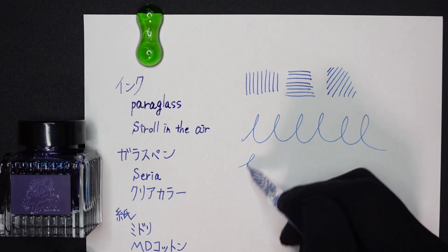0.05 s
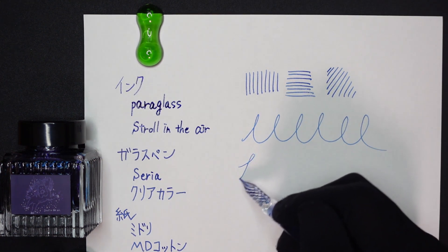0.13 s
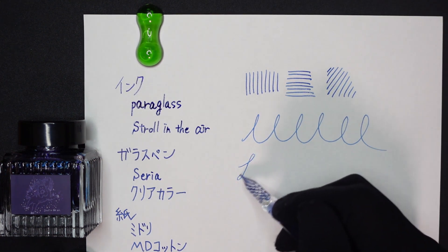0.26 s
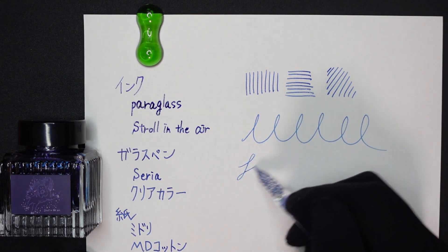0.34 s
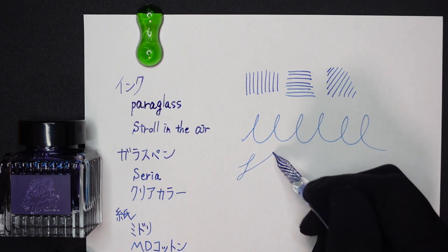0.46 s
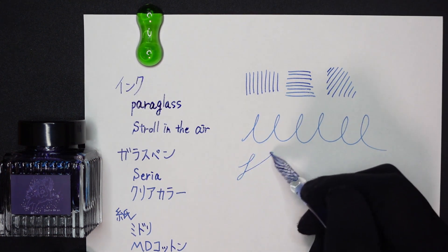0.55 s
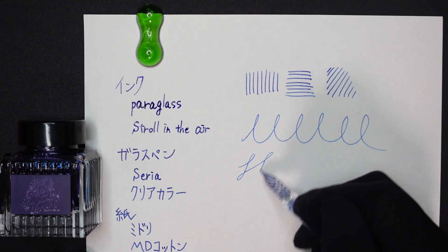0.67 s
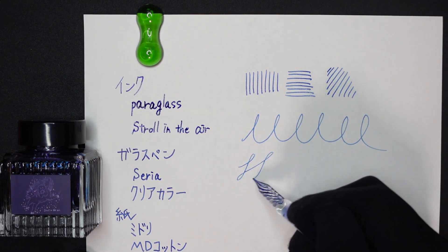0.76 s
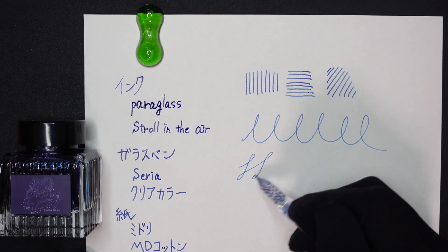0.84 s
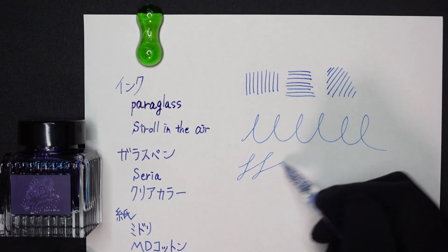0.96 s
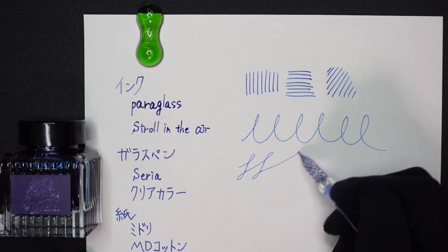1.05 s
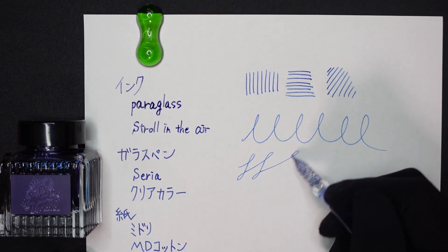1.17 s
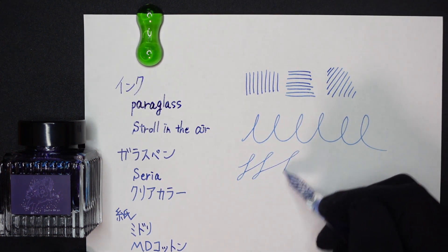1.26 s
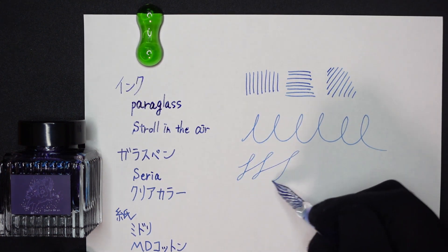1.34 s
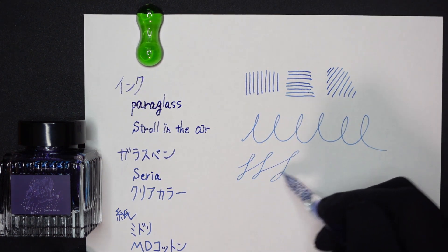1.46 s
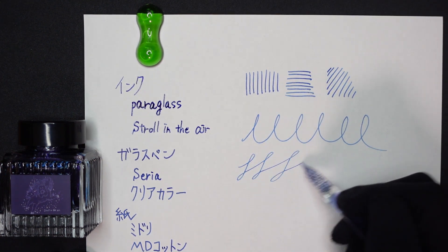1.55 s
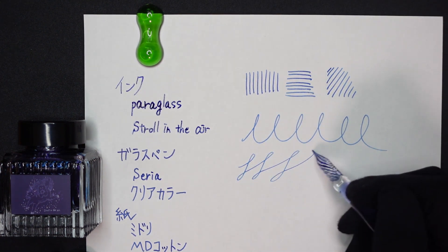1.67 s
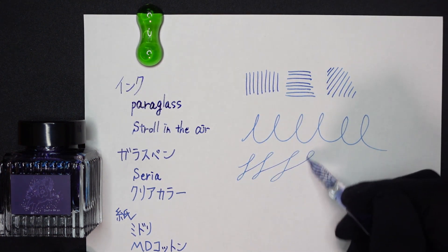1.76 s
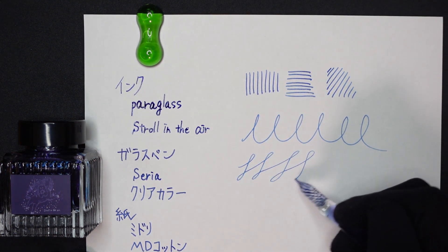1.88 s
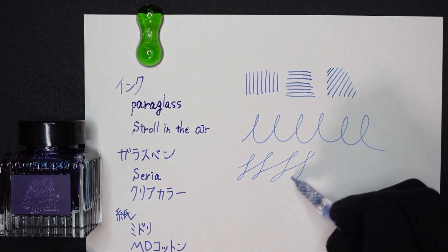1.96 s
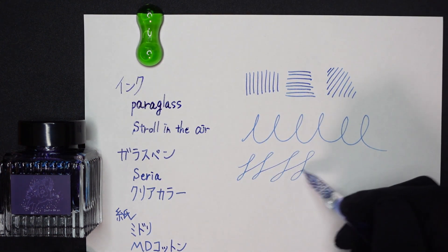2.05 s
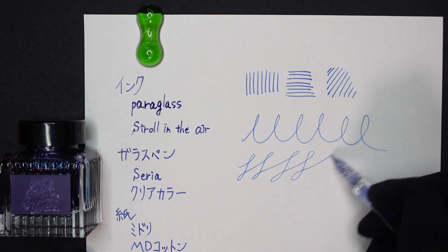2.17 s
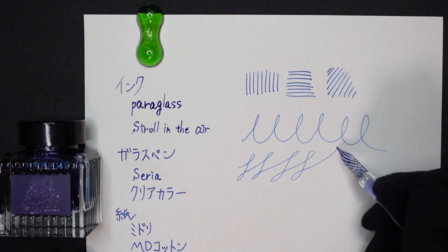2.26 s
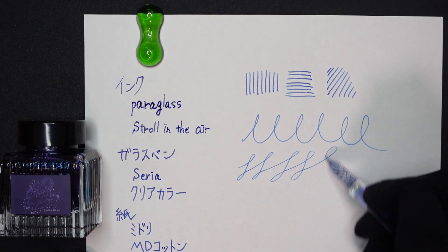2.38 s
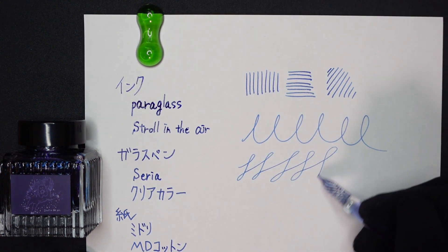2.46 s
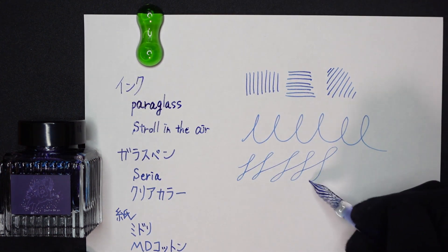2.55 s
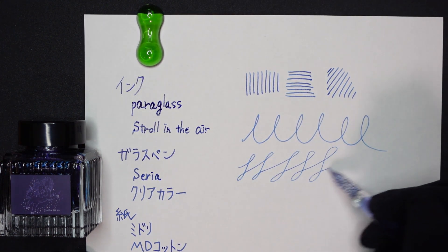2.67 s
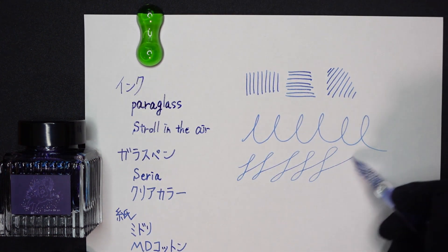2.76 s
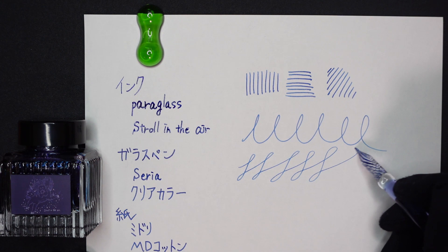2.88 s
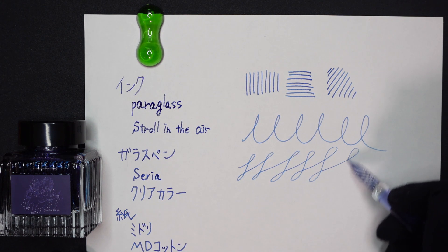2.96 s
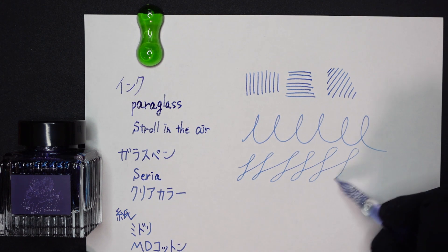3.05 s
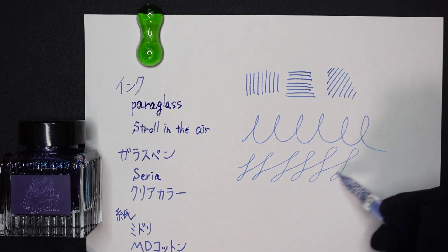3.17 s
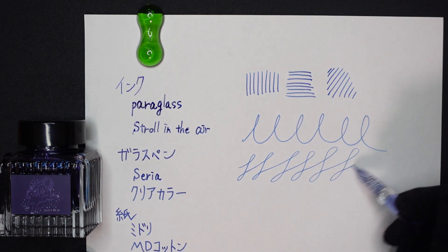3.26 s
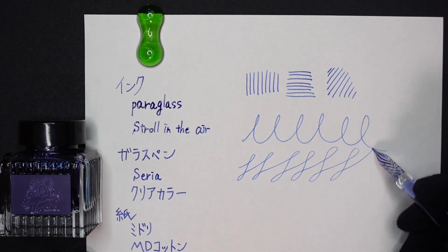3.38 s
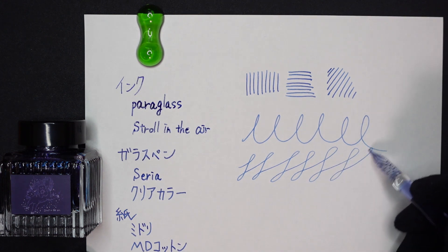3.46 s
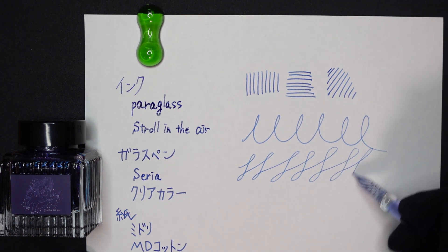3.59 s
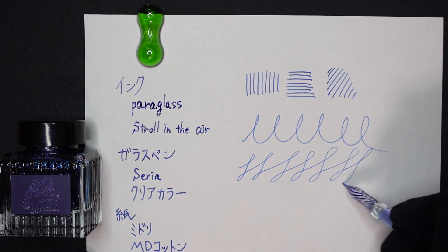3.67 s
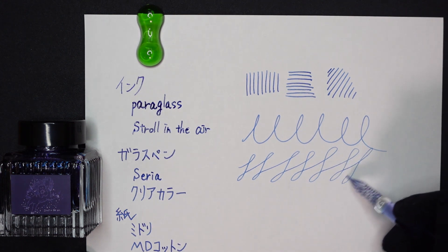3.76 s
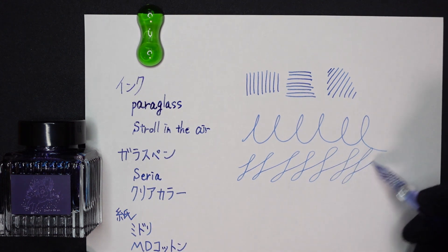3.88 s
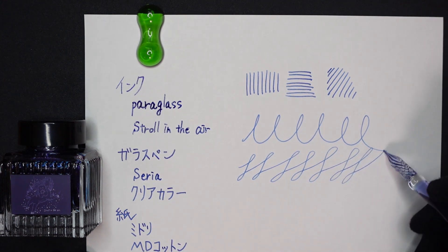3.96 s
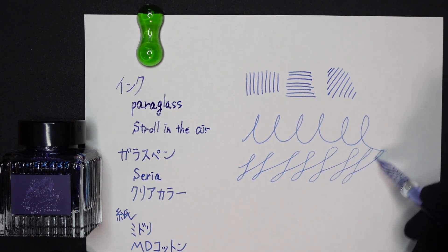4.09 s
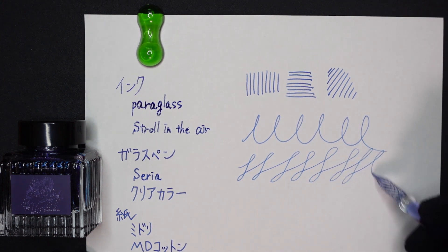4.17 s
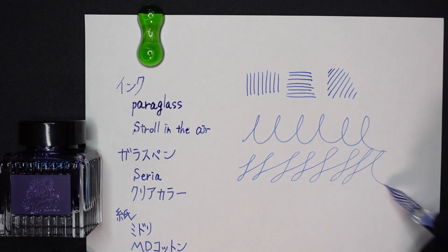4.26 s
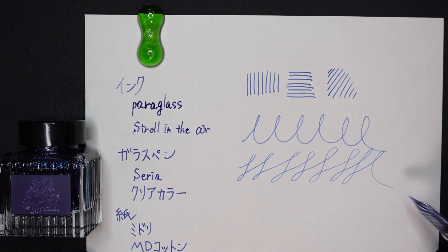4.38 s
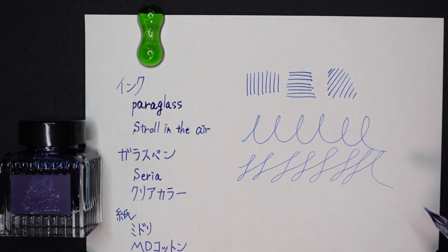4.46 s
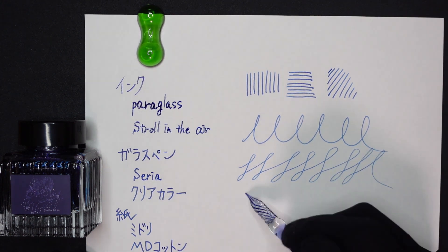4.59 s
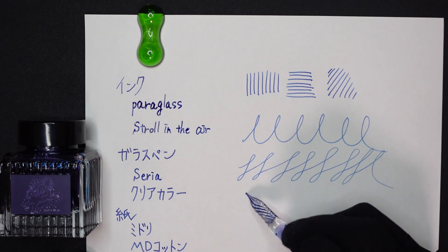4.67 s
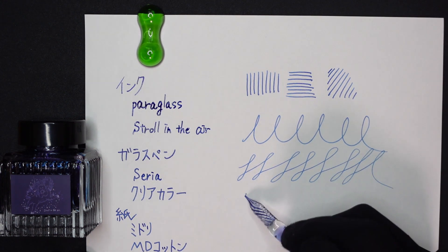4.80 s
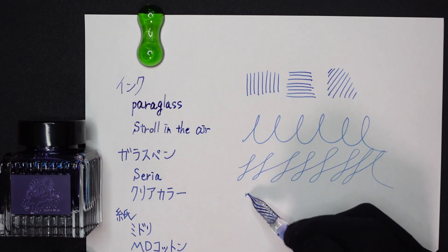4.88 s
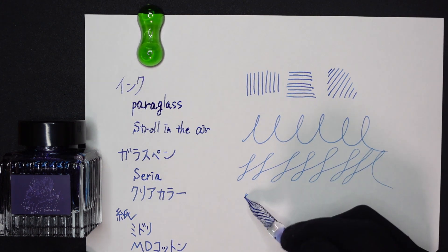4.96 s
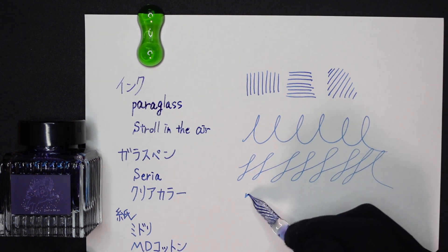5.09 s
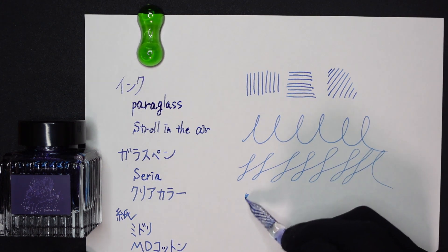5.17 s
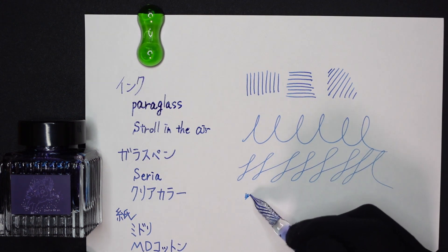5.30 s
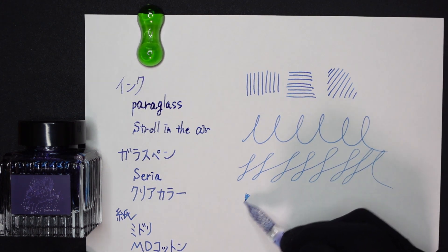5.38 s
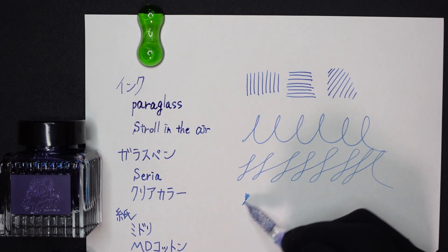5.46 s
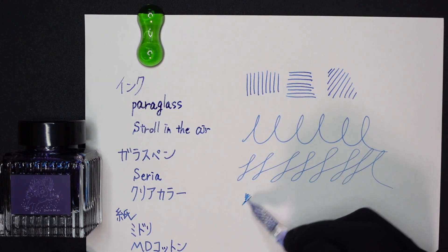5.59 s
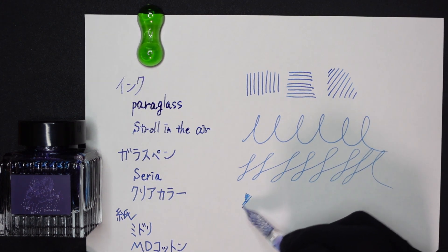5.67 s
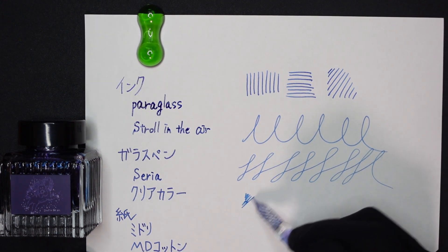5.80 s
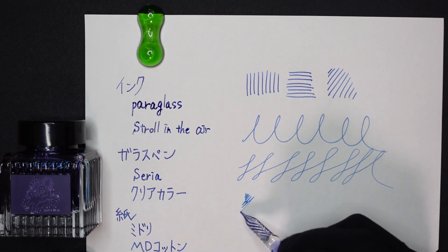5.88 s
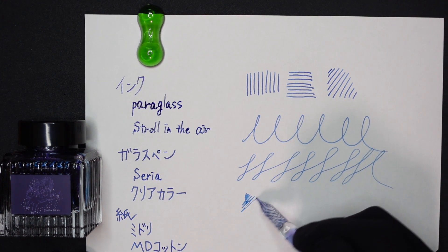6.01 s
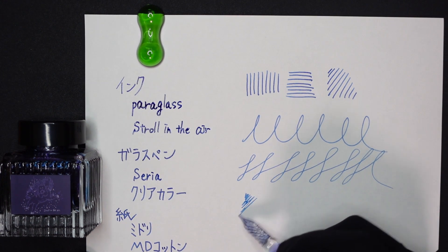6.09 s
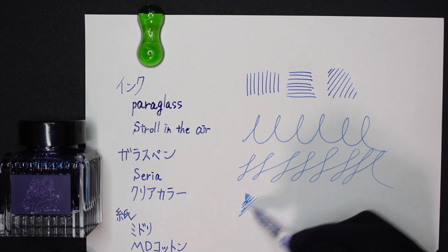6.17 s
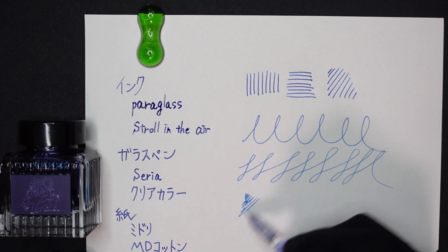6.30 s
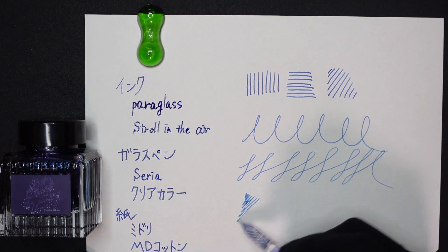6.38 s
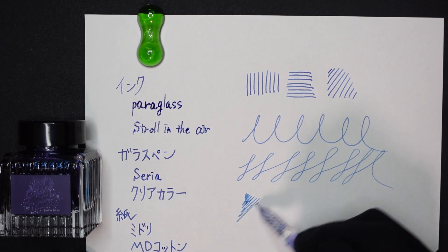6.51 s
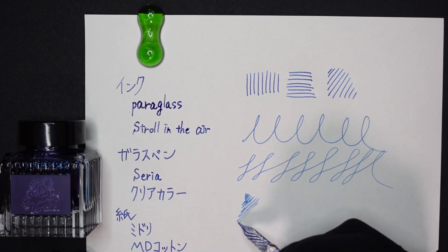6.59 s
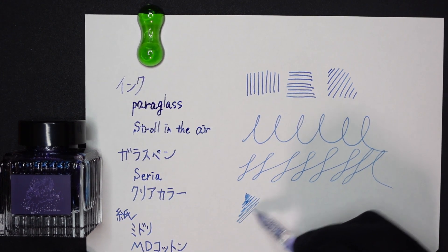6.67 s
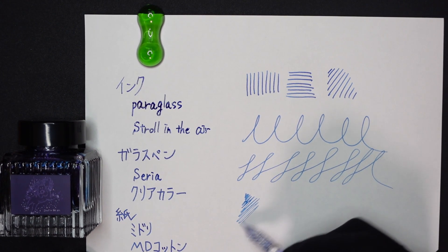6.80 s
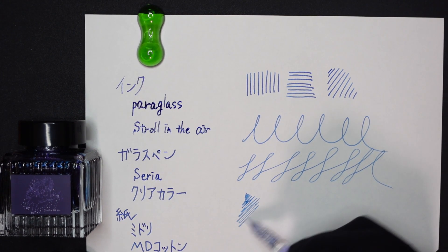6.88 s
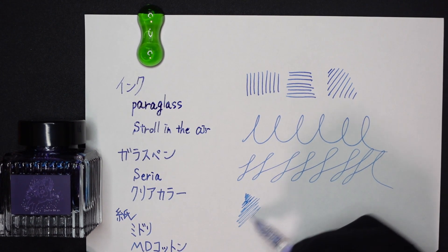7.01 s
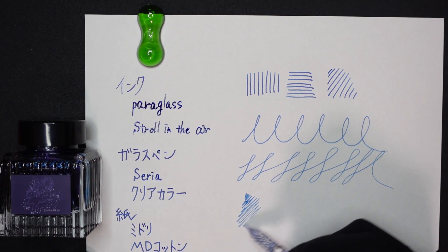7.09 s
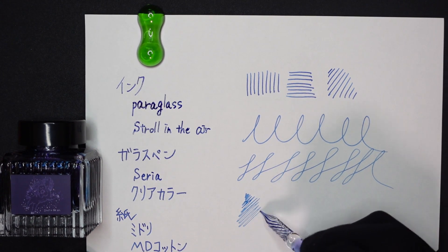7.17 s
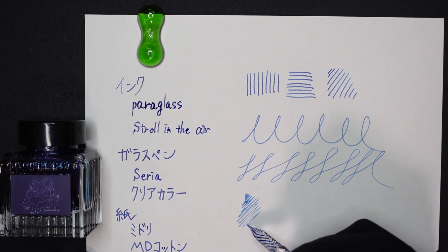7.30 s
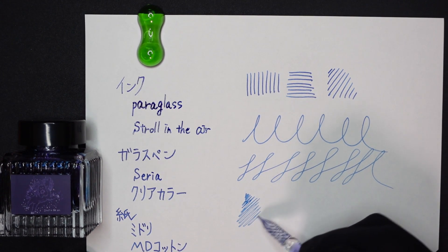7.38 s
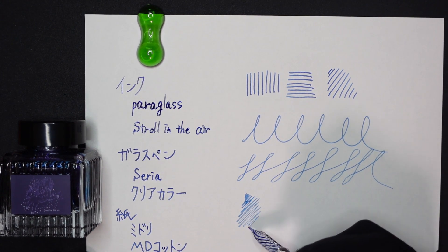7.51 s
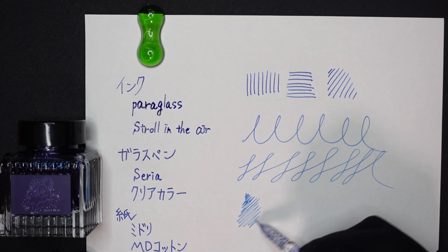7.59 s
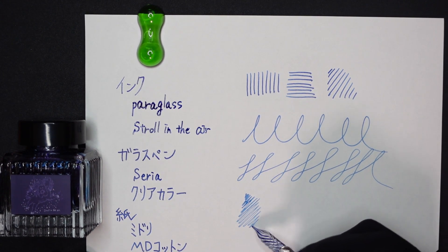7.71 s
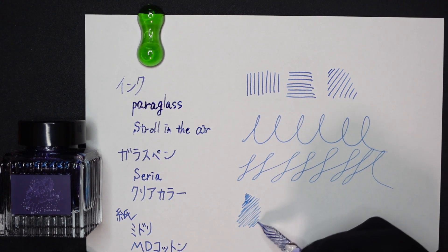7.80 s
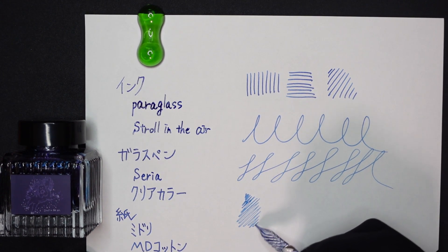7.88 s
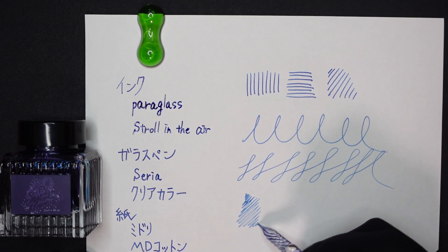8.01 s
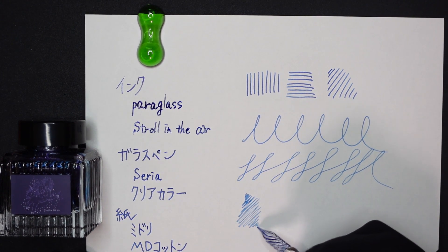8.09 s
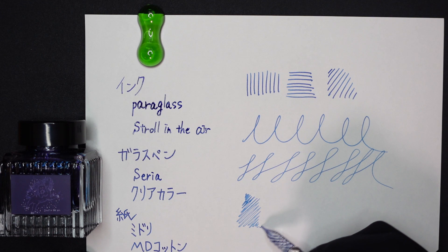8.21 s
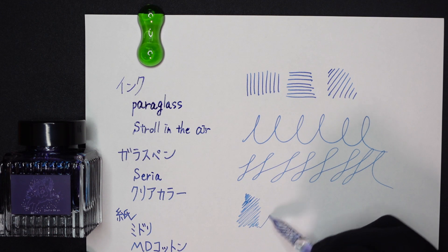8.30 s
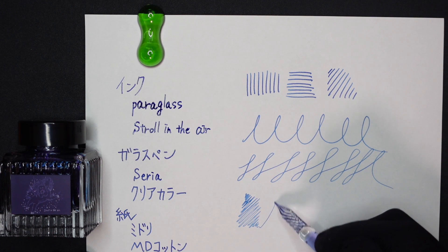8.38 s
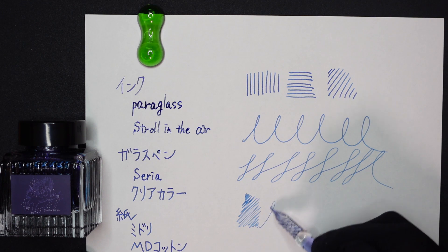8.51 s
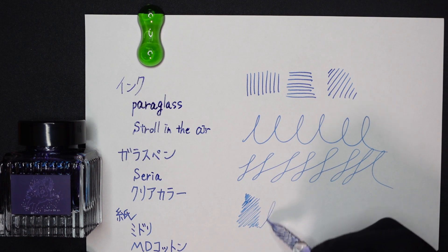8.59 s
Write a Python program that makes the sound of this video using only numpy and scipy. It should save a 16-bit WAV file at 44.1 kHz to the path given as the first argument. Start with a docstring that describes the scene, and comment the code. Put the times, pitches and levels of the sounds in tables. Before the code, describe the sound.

Close, dry pen scratching on textured paper: rhythmic looping swishes, a hand slide, rapid back-and-forth hatching that rises and fades, then two final strokes.

```python
"""A glass pen writes on a sheet of rough paper on a desk: a row of slow loops, then, after the hand
slides back, quick hatching that swells and fades, and two last strokes.
The nib catches on paper fibres thousands of times a second; these impulses excite resonances of nib, barrel and desk.
The hand slides and bumps, the arm rumbles on the desk, and a short diffuse tail and faint room noise lie behind.
A single close microphone feeds both channels."""
import sys
import numpy as np
from scipy import signal
from scipy.fft import rfft, irfft
from scipy.io import wavfile

SR = 44100
rng = np.random.default_rng(int(sys.argv[2]) if len(sys.argv) > 2 else 0)


def bounce(signal):
    """Save signal as a 16-bit WAV file at the path given by the first command-line argument."""
    frames = np.transpose(np.atleast_2d(signal))
    limited = np.clip(frames, -1, 1)
    pcm = np.round(limited * 32767).astype(np.int16)
    wavfile.write(sys.argv[1], SR, pcm)


N = 381457


def from_db(db):
    """Decibels to amplitude ratio: 20 dB per factor of ten."""
    return 10 ** (np.asarray(db) / 20)


def rms_one(x):
    """Normalise the mean power: scale to unit rms."""
    return x / np.sqrt(np.mean(x ** 2) + 1e-20)


def in_time(rows):
    """Piecewise-linear envelopes: columns of a curve table at every sample, -200 dB outside it."""
    times, *columns = np.transpose(rows)
    t = np.arange(N) / SR
    return np.array([np.interp(t, times, column, -200, -200) for column in columns])


def drift(rate_hz):
    """Low-passed chance: white noise through two equal real poles, scaled to unit rms."""
    r = np.exp(-2 * np.pi * rate_hz / SR)
    settle = 9000   # samples dropped while the filter settles
    noise = rng.standard_normal(N + settle)
    return rms_one(signal.lfilter([1], [1, -2 * r, r * r], noise)[settle:])


def shaped(x, spectrum):
    """Linear filtering in the frequency domain by a table of (frequency [Hz], gain [dB])."""
    hz, level_db = np.transpose(spectrum)
    grid = np.fft.rfftfreq(N, 1 / SR) + 1   # 1 Hz up, so the logarithm exists at zero
    gain = from_db(np.interp(np.log(grid), np.log(hz), level_db))
    return irfft(rfft(x) * gain, N)


def coloured(spectrum):
    """Coloured noise: white noise given a spectral shape, at unit rms."""
    return rms_one(shaped(rng.standard_normal(N), spectrum))


def still_room():
    """Background noise: a steady random sound with the spectrum of the quiet room."""
    # spectrum of the quiet room: (frequency [Hz], relative level per Hz [dB])
    still_spectrum = [(18, -30), (30, 0.5), (656, 6.5), (728, -1), (15500, -16.5)]
    return from_db(-99.5) * coloured(still_spectrum)


def room(x):
    """Diffuse reverberation: convolution with exponentially decaying noise, a little duller than the source."""
    t60_s, onset_s = 0.14, 0.004
    t = np.arange(SR // 2) / SR
    tail = rng.standard_normal(len(t)) * from_db(-60 * t / t60_s) * (t > onset_s)
    tail = signal.lfilter([1], [1, -.3], tail)
    return signal.fftconvolve(x, tail / np.sqrt(np.sum(tail ** 2)))[:N]


def hand():
    """Sliding friction as noise with an airy top, the arm's rumble, and bumps exciting the desk's lowest mode."""
    # hand sliding on the sheet: (time [s], slide level [dB], airy top level [dB])
    slide_levels = [(4.556, -120, -120), (4.559, -63, -80), (4.66, -66.5, -101), (4.72, -76, -79),
                    (4.78, -78.5, -81), (5.4, -72.5, -78), (6.0, -63, -97), (7.0, -65, -84.5),
                    (7.6, -77.5, -81.5), (8.0, -96.5, -102), (8.3, -98.5, -104)]
    # spectrum of skin on paper: (frequency [Hz], relative level per Hz [dB])
    slide_spectrum = [(18, -37), (30, -12.5), (479, -14), (575, -16.5), (945, -8.5), (1680, -14),
                      (1870, -15), (6720, -22.5), (15500, -26.5)]
    # low rumble of the arm on the desk: (time [s], level [dB])
    rumble_levels = [(0.0, -74), (0.12, -80.5), (3.93, -88), (4.04, -81), (4.43, -106), (4.58, -95),
                     (4.82, -101), (5.9, -79.5), (7.28, -81.5), (8.12, -102), (8.65, -88.5)]
    # heel of the hand bumping the desk: (time [s], drive level [dB])
    bump_levels = [(0.169, -77), (0.72, -70.5), (0.953, -88), (1.353, -73), (1.625, -82), (1.899, -80),
                   (2.199, -80.5), (2.499, -89), (3.052, -80.5), (3.388, -83), (3.999, -79.5)]

    slide_db, airy_db = in_time(slide_levels)
    slide = from_db(slide_db) * coloured(slide_spectrum)
    high_pass = signal.butter(4, 9000, "high", fs=SR, output="sos")
    airy = from_db(airy_db) * rms_one(signal.sosfilt(high_pass, rng.standard_normal(N)))

    rumble_spectrum = [(10, 0), (25, -2.5), (70, 4.0), (130, 4), (200, 2.0), (20000, -80.0)]   # (Hz, dB)
    rumble = from_db(in_time(rumble_levels)[0]) * coloured(rumble_spectrum)

    t = np.arange(SR // 4) / SR
    thud = np.sin(2 * np.pi * 71 * t) * t / 0.017 * np.exp(1 - t / .03)   # 71 Hz, soft onset
    bumps = np.zeros(N)
    for s, drive_db in bump_levels:
        bumps[round(s * SR)] = from_db(drive_db)
    return slide + airy + rumble + signal.fftconvolve(bumps, thud)[:N]


def add(force, s, levels_db, shapes):
    """Superposition: lay one movement of the nib onto the forces on all parts."""
    start = round(s * SR)
    span = force[:, start:start + shapes.shape[1]]   # a view, cut short at the end
    span += (from_db(levels_db)[:, None] * shapes)[:, :span.shape[1]]


def hump(length_s, top, sharpness):
    """Skewed half-sine: from rest to full at the given place 0-1, and back to rest."""
    along = np.linspace(0, 1, round(length_s * SR))
    skew = np.log(.5) / np.log(np.clip(top, .1, .9))
    return np.sin(np.pi * along ** skew).clip(0) ** sharpness


def shared(scratch_db, squeak_db, *others_db):
    """Power division: nib ring and squeak together make the scratch level; other parts are relative to it."""
    nib_db = -10 * np.log10(1 + from_db(2 * squeak_db))
    return scratch_db + np.array([nib_db, nib_db + squeak_db, *others_db])


def loops():
    """Speed-dependent friction: fast runs drive every part; slow bends are thin and mostly ring the nib."""
    # fast straight runs, the two last strokes among them: (time of top speed [s], speeding up [s],
    # slowing down [s], scratch [dB], squeak re nib ring [dB],
    # then re scratch: barrel [dB], desk [dB], shank [dB], hiss [dB], air [dB])
    runs = [(0.136, 0.11, 0.14, -49.5, -7, -1, 0.4, -3, -8.5, -12),
            (0.45, 0.19, 0.12, -48, -2, -0.5, -0.1, -2, -8, -11),
            (0.738, 0.12, 0.13, -52, -3, -0.5, 1, 0.5, -6.5, -8),
            (1.036, 0.16, 0.14, -50, 0.5, 2.5, 2, 2.5, -3, -8),
            (1.34, 0.092, 0.12, -53.5, -6, 2, 5, -1, -5.5, -12),
            (1.622, 0.19, 0.14, -50.5, -4.5, 1, 0.6, 0, -4.5, -13),
            (1.885, 0.1, 0.13, -50.5, -8.5, -0.2, -4, -3, -9, -16),
            (2.218, 0.19, 0.12, -46, -6.5, -5, -6.5, -5, -7.5, -20),
            (2.501, 0.11, 0.15, -48, -13, -7, -9, -3.5, -11, -25),
            (2.808, 0.15, 0.099, -46.5, -7.5, -3.5, -4.5, -3, -4, -22),
            (3.084, 0.095, 0.1, -49, -12.5, -3, -1.5, -1.5, -5, -20),
            (3.373, 0.14, 0.1, -50, -10.5, -12.5, -5, -6, -2.5, -14),
            (3.66, 0.15, 0.12, -52, -7.5, -5.5, -4.5, -4, -4, -14.5),
            (3.96, 0.14, 0.11, -48, -13.5, -11, -6.5, -6, -2.5, -13.5),
            (4.201, 0.088, 0.15, -58, -10.5, -5, -11.5, -6, -4.5, -3.5),
            (4.334, 0.085, 0.047, -55, -11.5, -12, -25, -8.5, 1.5, -5),
            (8.401, 0.095, 0.092, -49, -0.2, -2, -13, -5.5, -6, -23),
            (8.66, 0.12, 0.1, -51.5, -3, -15.5, -26, -13.5, -11.5, -26)]
    # slow bends round the loop ends: (start [s], length [s], scratch [dB], squeak re nib ring [dB],
    # then re scratch: barrel [dB], shank [dB], hiss [dB])
    bends = [(0.001, 0.025, -74, -7, -2.5, 0, -8), (0.016, 0.075, -61, -9, -7, -8, -8.5),
             (0.252, 0.079, -64, -3, -3, -4, -13), (0.527, 0.095, -71, -8, -6, -2.5, -7),
             (0.597, 0.069, -68.5, -7, -5, -2, -6), (0.82, 0.08, -84, -5, 5, 0.4, -3),
             (0.871, 0.15, -68.5, -4, 9.5, 2, -9), (1.149, 0.085, -65.5, -6, -4, -3, -5),
             (1.203, 0.16, -55, -12, -14, -8.5, -13), (1.425, 0.054, -82, -9, 8, -8, -4),
             (1.458, 0.12, -67, -11.5, 7.5, -5, -13), (1.724, 0.085, -62.5, -6.5, -9, -5, -11),
             (1.792, 0.065, -59.5, -23, -9, -9, -10), (1.97, 0.068, -82, -6, 0.4, 5, -6),
             (2.013, 0.073, -66.5, 0, -9, -5, -15), (2.308, 0.12, -68.5, -7, -10, -3.5, 0.5),
             (2.382, 0.1, -63.5, -26, -8, -6, -11), (2.623, 0.13, -59.5, 0, -11, -6.5, -9),
             (2.863, 0.12, -69, -10, -11, -4.5, 0), (2.965, 0.17, -57, -21, -25, -7, -1),
             (3.175, 0.13, -59.5, -7.5, -8, -7.5, -7), (3.45, 0.25, -83.5, -20, -9.5, -11, 4),
             (3.775, 0.1, -64.5, 6, -2.5, -10, -3), (4.036, 0.081, -85, -10.5, -8, -2, 3),
             (4.092, 0.102, -63, -27, -23, -10, -5), (4.346, 0.097, -88, -9, -8, -2.5, 5),
             (8.283, 0.074, -70, 2, -14, -12.5, -14), (8.31, 0.041, -61.5, 4, -21, -8, -15),
             (8.458, 0.087, -83, -4, 1, -6, -3), (8.515, 0.096, -69.5, 7, -18, -7, -10)]
    start_sharpness, stop_sharpness = 2.65, 2.27
    desk_sharpness = 1.4   # the desk follows the speed more steeply
    bend_desk_db = -11   # relative to the scratch

    force = np.zeros((7, N))
    run_times, run_airs_db = np.transpose(runs)[[0, -1]]
    for s, up, down, scratch_db, *colours_db in runs:
        speeding, slowing = np.linspace(0, .5, round(up * SR)), np.linspace(.5, 1, round(down * SR))
        phase = np.r_[speeding, slowing]
        sharpness = np.where(phase < .5, start_sharpness, stop_sharpness)
        speed = np.sin(np.pi * phase).clip(0) ** sharpness
        desk = speed ** desk_sharpness
        shapes = np.array([speed, speed, speed, desk, speed, speed, speed])
        add(force, s - up, shared(scratch_db, *colours_db), shapes)
    for s, length, scratch_db, squeak_db, barrel_db, shank_db, hiss_db in bends:
        air_db = np.interp(s + length / 2, run_times, run_airs_db)   # as in the runs nearby
        levels_db = shared(scratch_db, squeak_db, barrel_db, bend_desk_db, shank_db, hiss_db, air_db)
        add(force, s, levels_db, hump(length, top=0.42, sharpness=1)[None])
    return force


def hatching():
    """Friction from rest to rest: force follows each stroke's speed, while the desk follows its pressure."""
    # hatching strokes: (start [s], length [s], nib [dB], barrel re nib [dB], desk re nib [dB])
    strokes = [(4.774, 0.047, -62.5, 0.5, -13), (4.885, 0.065, -74, 2, -8), (4.97, 0.086, -68, 1.2, -23),
               (5.078, 0.07, -68.5, 10, 0.5), (5.19, 0.0934, -65.5, 0.5, -3), (5.291, 0.093, -67.5, 7, 4),
               (5.399, 0.11, -56, 2.8, 4), (5.511, 0.1, -55.5, 7.5, 5), (5.625, 0.11, -54.5, 2.5, 0),
               (5.733, 0.11, -54, 8.5, 7.5), (5.854, 0.1, -52, 4, 6), (5.961, 0.11, -51.5, 6, 5),
               (6.073, 0.1236, -51, 5, 4.5), (6.197, 0.11, -48, 9.5, 4), (6.311, 0.13, -47.5, 4, 6),
               (6.445, 0.11, -44.5, 6.5, 4), (6.559, 0.12, -47.5, 3.5, 4), (6.686, 0.11, -46, 7, 2.5),
               (6.801, 0.12, -48, 4.5, 0.96), (6.92, 0.11, -44, 5, -1.5), (7.03, 0.12, -47.5, 2.5, 0.6),
               (7.155, 0.098, -46.5, 4, 0), (7.271, 0.0965, -50.5, -2, 4.5), (7.392, 0.088, -52.5, 4, -1),
               (7.502, 0.094, -54.5, -4, -1.5), (7.619, 0.085, -52.5, -3.5, -17),
               (7.717, 0.09, -60.5, -12.5, -13.5), (7.824, 0.066, -64.5, 1.5, -15),
               (7.92, 0.057, -72.5, -12, -11.5), (8, 0.05, -90.5, -2, 0), (8.085, 0.049, -95, -1.5, 6.5)]
    # colour of the hatching, dulling as it goes: (time [s], then re nib: shank [dB], hiss [dB], air [dB])
    stroke_colours = [(4.7, 0.5, -7, -7), (5.3, -2, -6, -11), (5.7, 0.5, -0.5, -12),
                      (6.299, -0.5, -3.5, -16), (7.0, -2, -7.5, -22), (7.501, -4, -7, -22),
                      (7.8, -7.5, -14, -26), (8.199, -12.5, -24, -33)]
    # place of hardest pressure within a stroke, 0-1: (outward, back)
    pressed_at = [0.55, 0.53]
    squeak_db = 1.96   # relative to the nib

    force = np.zeros((7, N))
    times, *colours = np.transpose(stroke_colours)
    for k, (s, length, nib_db, barrel_db, desk_db) in enumerate(strokes):
        speed = hump(length, top=0.5, sharpness=1.35)
        pressure = hump(length, pressed_at[k % 2], sharpness=1.2)
        shank_db, hiss_db, air_db = [np.interp(s, times, c) for c in colours]
        levels_db = nib_db + np.array([0, squeak_db, barrel_db, desk_db, shank_db, hiss_db, air_db])
        shapes = np.array([speed, speed, speed ** 1.17, pressure, speed, speed, speed])
        add(force, s, levels_db, shapes)
    return force


def fibres(per_s, spread_db, grain):
    """Random impulse train: dense uneven catches on fibres, made patchy by the paper's grain."""
    sizes = from_db(spread_db * np.minimum(rng.exponential(1, N), 4)) * rng.choice([-1, 1], N)
    caught = rng.random(N) < per_s / SR
    return rms_one(sizes * caught * grain)


def ring(force, modes, place, wander_db):
    """Modal summation: parallel resonances of alternating sign, their coupling set by nib place and grip."""
    pulse = np.zeros(8192)
    pulse[0] = 1
    out, reply = 0, 0
    for k, (hz, width_hz, level_db, across_db) in enumerate(modes):
        r = np.exp(-np.pi * width_hz / SR)
        b = (-1) ** k * from_db(level_db) * (1 - r * r) * np.array([1, 0, -1])
        a = [1, -2 * r * np.cos(2 * np.pi * hz / SR), r * r]
        coupling = from_db(across_db * place + wander_db * drift(2.53))
        out = out + signal.lfilter(b, a, force * coupling)
        reply = reply + signal.lfilter(b, a, pulse)
    return out / np.sqrt(np.sum(reply ** 2))   # unit energy in the impulse response


def pen():
    """Forced vibration: fibre catches drive the resonances of every part; ticks are single larger catches."""
    # resonances: (frequency [Hz], width [Hz], relative level [dB], change from left to right edge [dB])
    nib_modes, squeak_modes, barrel_modes = [(7140, 550, 0, 5.8), (7640, 520, 13.5, 0.066),
                                             (8800, 200, -0.5, 3.5)], [(5580, 1600, 1.9, -2.5), (6570, 870, 13, 5.5)], [(1223, 78, -7, -8),
                                                                          (1444, 120, -4, -4.5),
                                                                          (1484, 139, 0, -3.5),
                                                                          (1604, 153, -1.5, 0.1),
                                                                          (1925, 72, -7, -1.5),
                                                                          (2157, 210, -15.5, 4.5)]
    desk_modes, shank_modes = [(235, 54.5, -5, 5.5), (362.4, 45, -9, 8.5), (445.6, 29.6, -3.5, 2.5),
                               (522.3, 22, -4, 2.3), (603.3, 21.8, 3, 0.5), (705, 20, -3.5, -1.3),
                               (769.6, 24, -2, -10), (889.6, 14, -4, 3), (926, 73, -15.5, 2),
                               (1019, 52, -2.5, -1)], [(2760, 670, -7, 2.5), (3420, 64, -1.5, -7),
                                             (4050, 220, 1.5, 2.5), (4154, 47, -31, 25),
                                             (4960, 750, -3.5, -17.5)]
    hiss_modes, air_modes = [(9440, 1000, -9.5, 0.5), (11700, 340, 2, -2.5), (11580, 300, 1, -2.5),
                             (13300, 780, -15, 0)], [(12900, 1300, 0.0066, -8.2), (15200, 2400, 0.0099, -9.5)]
    # radiating range of nib, squeak, barrel, desk, shank, hiss and air: (low edge [Hz], high edge [Hz])
    ranges = [(6460, 9200), (5660, 7400), (980, 3630), (184.2, 1270), (2350, 5460), (9360, 12800),
              (12300, 18000)]
    # nib set down or caught: (time [s], drive level [dB], treble re drive level [dB])
    ticks = [(0.878, -55.5, -7.5), (3.788, -79, 22.5), (4.651, -46.5, -14.5), (4.665, -60, 4.5),
             (4.786, -60, 6), (4.882, -67, 0), (5.408, -60, -9.5), (5.99, -32, -12.5), (8.322, -69, 6)]
    # nib's place on the sheet: (time [s], place from 0 at the left edge to 1 at the right)
    nib_places = [(0, 0.065), (2.0, 0.39), (3.2, 1), (4.5, 0.85), (4.6, .3), (8.2, 0.043), (8.65, 0.97)]

    parts = [nib_modes, squeak_modes, barrel_modes, desk_modes, shank_modes, hiss_modes, air_modes]
    dull, bright = np.zeros((2, N))
    for s, drive_db, treble_db in ticks:
        dull[round(s * SR)] = from_db(drive_db + 10.5)
        bright[round(s * SR)] = from_db(drive_db + treble_db + 8.5)
    knocks = [bright, bright, dull, dull, bright, bright, 0.56 * bright]
    fine, coarse = from_db(1.3 * drift(63)), from_db(1.37 * drift(75))   # grain for treble and for body
    grains = [fine, fine, coarse, coarse, fine, fine, fine]
    place = np.interp(np.arange(N) / SR, *np.transpose(nib_places))
    forces = loops() + hatching()

    out = np.zeros(N)
    for force, grain, knock, modes, edges_hz in zip(forces, grains, knocks, parts, ranges):
        catches = force * fibres(11000, spread_db=2.5, grain=grain) + knock + 1e-18
        rung = ring(catches, modes, place, wander_db=2.0)
        band_pass = signal.butter(2, edges_hz, "band", fs=SR, output="sos")
        out += signal.sosfilt(band_pass, rung)
    return out


def scene():
    """Superposition at one microphone feeding both channels, with a faint blurred trace of opposite sign in each."""
    # filter for the trace that differs between channels: (frequency [Hz], gain [dB])
    apart_spectrum = [(60, -8.5), (180, -43), (550, -60), (1650, -63.5), (4970, -60.5), (15000, -29)]
    high_pass = signal.butter(4, 180, "high", fs=SR, output="sos")   # the writing itself carries no deep bass
    writing = signal.sosfilt(high_pass, pen())
    reverberation = from_db(-17.5) * room(writing)
    heard = writing + reverberation + hand() + still_room()
    apart = shaped(room(heard), apart_spectrum)
    return np.array([heard + apart, heard - apart])


def record(dry):
    """Band limiting: a steep elliptic low-pass cuts the top above 15.9 kHz."""
    low_pass = signal.ellip(16, .5, 60, 15900, fs=SR, output="sos")   # 0.5 dB ripple, 60 dB stop band
    return signal.sosfilt(low_pass, dry)


dry = scene()
out = record(dry)
bounce(out)
```